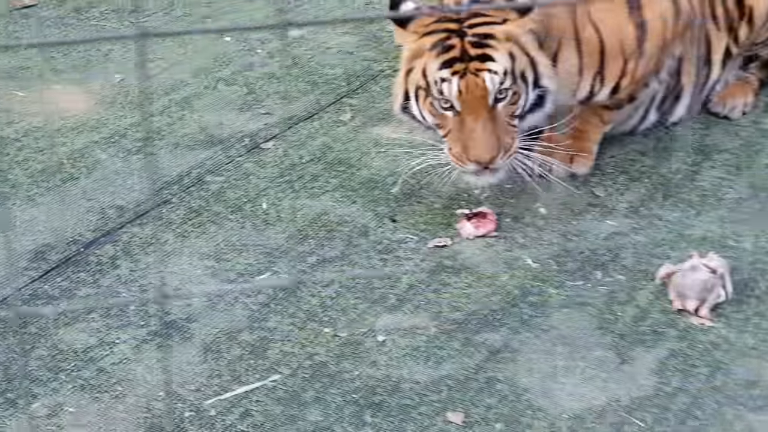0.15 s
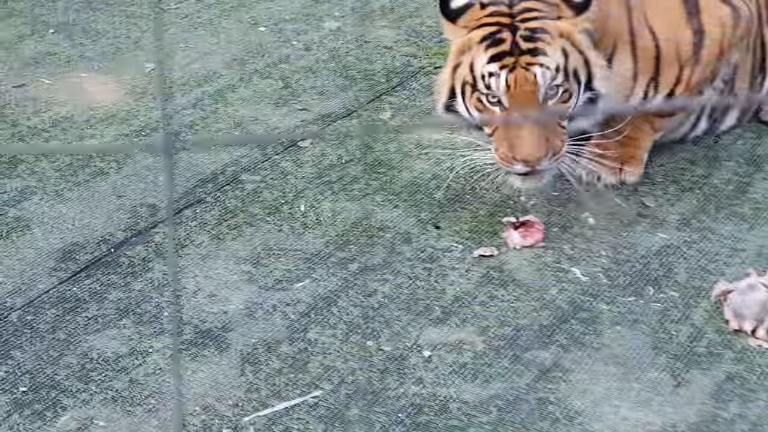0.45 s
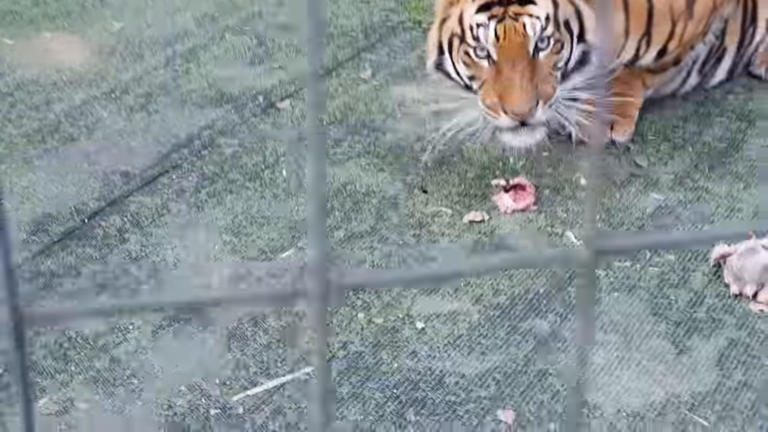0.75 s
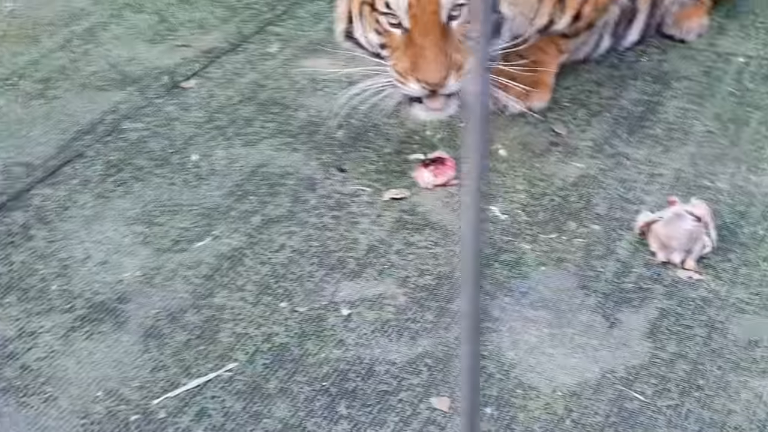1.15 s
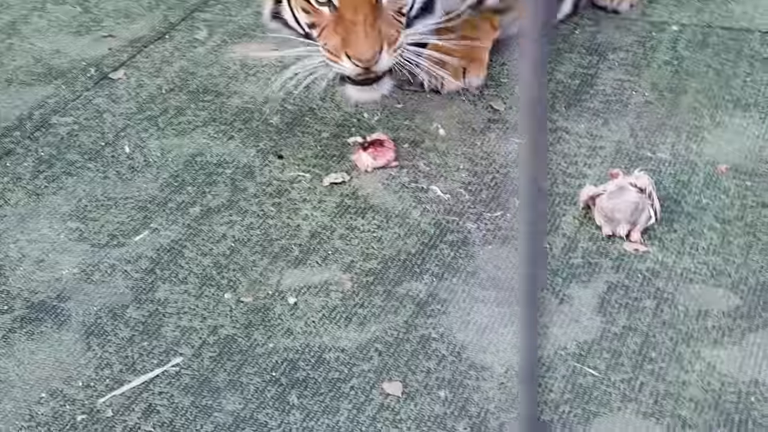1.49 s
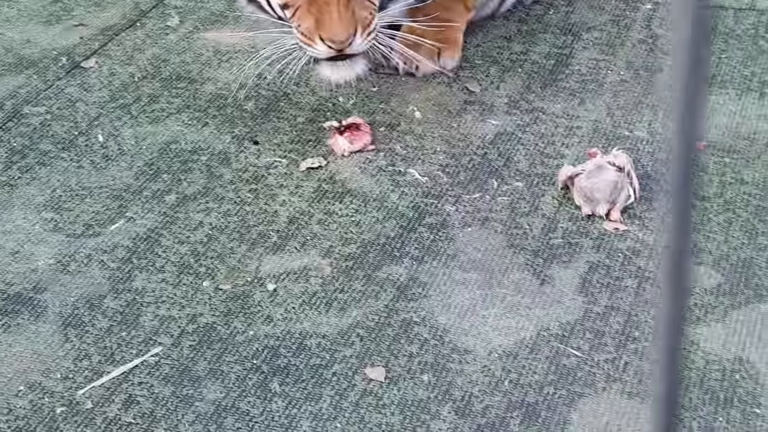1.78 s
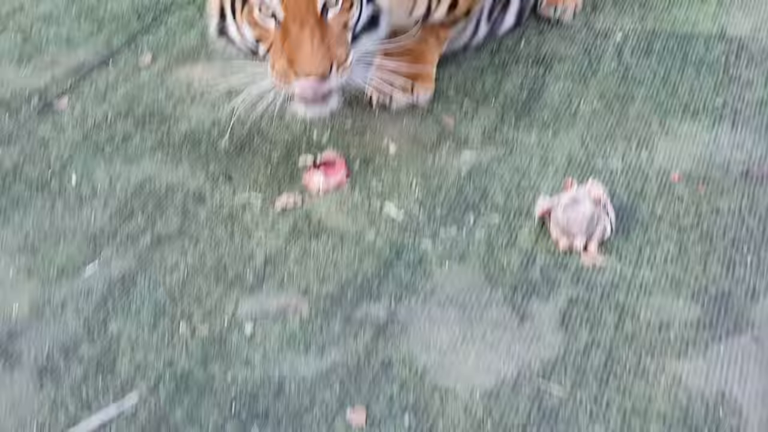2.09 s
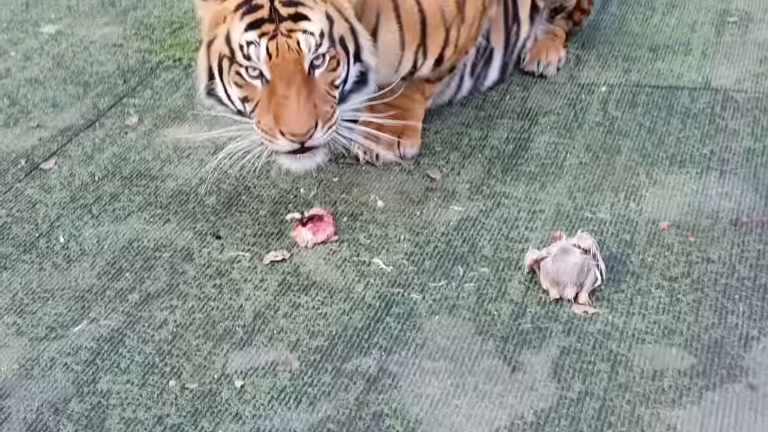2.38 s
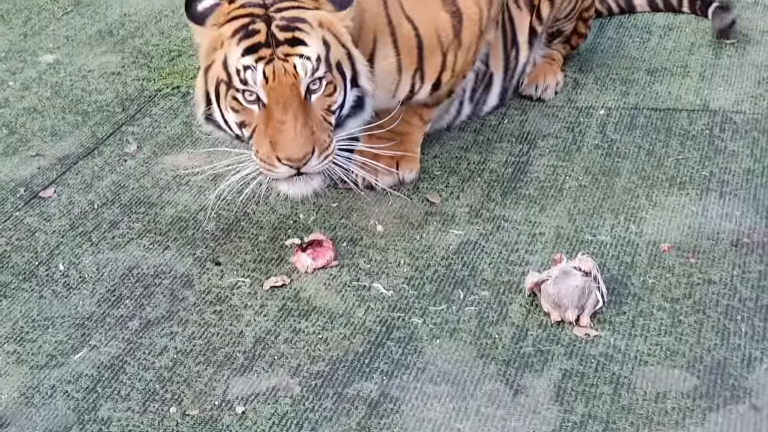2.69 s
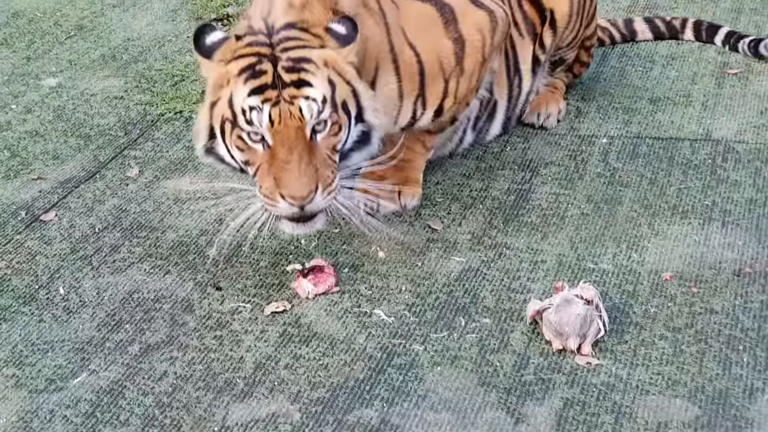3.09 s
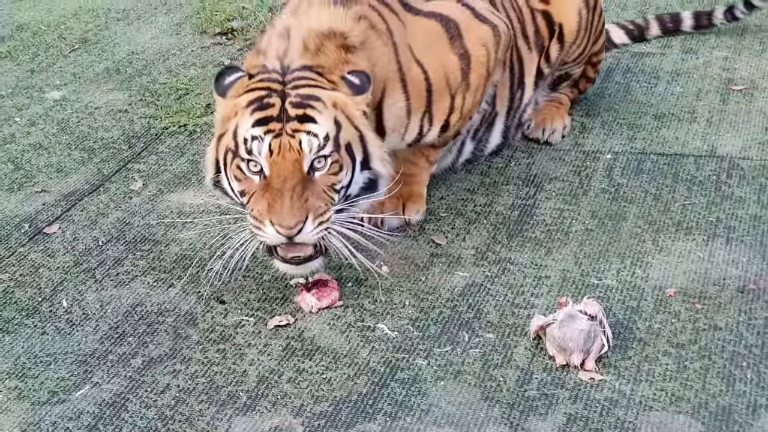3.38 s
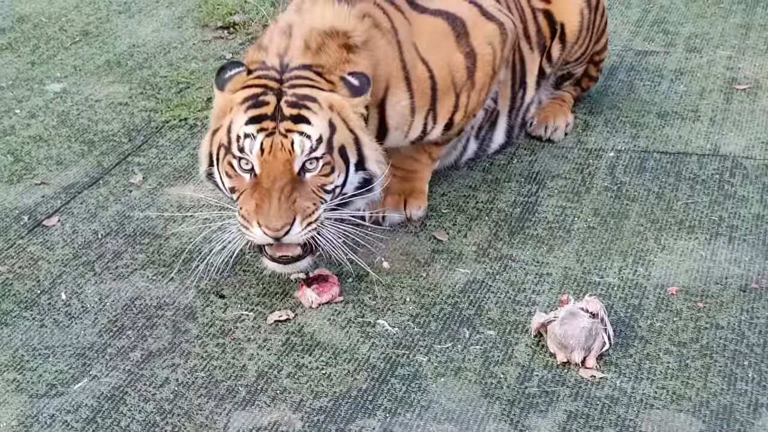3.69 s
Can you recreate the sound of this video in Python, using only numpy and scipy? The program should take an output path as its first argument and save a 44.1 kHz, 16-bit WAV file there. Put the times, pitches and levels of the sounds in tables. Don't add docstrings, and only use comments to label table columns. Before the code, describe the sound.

A tiger rumbles low and steady, then bursts into two rough open-mouthed snarls, close outdoors.

```python
import sys
import numpy as np
from scipy import signal
from scipy.fft import rfft, irfft, next_fast_len
from scipy.io import wavfile
from scipy.ndimage import uniform_filter1d, map_coordinates

SR = 44100
rng = np.random.default_rng(int(sys.argv[2]) if len(sys.argv) > 2 else 0)


def master_out(mix):
    frames = np.transpose(np.atleast_2d(mix))
    ceiling = np.clip(frames, -1, 1)
    pcm = np.round(ceiling * 32767).astype(np.int16)
    wavfile.write(sys.argv[1], SR, pcm)


def elevation(decibels):
    levels = np.asarray(decibels, float)
    return 10 ** (levels / 20)


N = 169785
T = np.arange(N) / SR


def unit(x):
    return x / np.sqrt(np.mean(x ** 2) + 1e-20)


def along(points, hz):
    f, v = np.transpose(points)
    return np.interp(np.log(hz + 1), np.log(f + 1), v)


def wobble(rate):
    return map_coordinates(rng.standard_normal(int(N * 400 / SR) + 4), [T * rate])


def filtered(x, response):
    m = next_fast_len(N + SR // 2)
    return irfft(rfft(x, m) * response(np.fft.rfftfreq(m, 1 / SR)), m)[..., :N]


def rings(peaks):
    def response(f):
        total = 0
        for k, (centre, width, db) in enumerate(peaks):
            damping = 1j * f * width
            total = total + (-1) ** k * elevation(db) * damping / (centre * centre - f * f + damping)
        return total
    return response


def rush(spectrum, alike, left_db):
    def mid_side(hz):
        turn = np.arccos(np.clip(along(alike, hz), -1, 1)) / 2
        return elevation(along(spectrum, hz)) * [np.cos(turn), np.sin(turn)]

    mid, side = filtered(rng.standard_normal((2, N)), mid_side)
    pair = np.array([mid + side, mid - side])
    return unit(filtered(pair, lambda hz: elevation(np.outer([.5, -.5], along(left_db, hz)))))


def outdoor_air():
    # f/Hz, level/dB
    air_colour = [(15, -6), (25, -34), (77, 1), (600, -29), (1210, -33), (2300, -44), (7540, -53),
                  (8860, -42), (15600, -60)]
    # f/Hz, level/dB
    air_left = [(100, 2.5), (9000, 3.6)]
    # f/Hz, likeness/0-1
    air_alike = [(150, 1), (950, 0.057), (4000, 0.041)]
    return elevation(-45.5 + 0.49 * wobble(2.8)) * rush(air_colour, air_alike, air_left)


def grass():
    # peak t/s, attack/s, release/s, level/dB
    scuffs = [
        (.005, 0.012, 0.0048, -48),
        (.3, .1, 0.58, -57),
        (.42, 0.09, 0.077, -60.5),
        (1.036, 0.055, 0.02, -42),
        (1.12, 0.14, 0.13, -55.5),
        (2.05, .04, 0.1, -94),
        (2.3, 0.022, 0.087, -70),
        (2.562, 0.036, 0.031, -52.5),
    ]
    # f/Hz, level/dB
    grass_colour = [(180, -6.5), (300, -14), (1310, -13), (4290, -32.5), (7050, -41), (9190, -28),
                    (15600, -36)]
    env = 0
    for s, up, down, db in scuffs:
        away = np.where(T < s, (s - T) / up, (T - s) / down)
        env = env + elevation(db - 7.8 * away ** 1.7)
    crackle = elevation(2.8 * wobble(300) + wobble(30.45))
    noise = rush(grass_colour, [(300, 1.0), (9000, 0.076)], [(300, 1.7), (9000, 2.5)])
    return env * unit(crackle * noise)


def yard(x):
    # f/Hz, t60/s
    decay = [(150, 1), (1500, 0.11), (10000, 0.2)]
    hz, t, z = signal.stft(rng.standard_normal((2, SR // 2)), SR, nperseg=256)
    tail = signal.istft(z * elevation(-60 * t / along(decay, hz)[:, None]), SR, nperseg=256)[1]
    mix = np.array([tail[0] + 0.15 * tail[1], tail[0] - 0.64 * tail[1]])
    late = np.pad(x, (300, 0))[None]
    echo = signal.fftconvolve(late, mix / np.linalg.norm(mix[0]), axes=1)[:, :N]
    return filtered(echo, lambda hz: elevation(-9) * hz / (hz + 303))


def nose():
    # f/Hz, width/Hz, level/dB
    nostril = [
        (2770, 610, 0),
    ]
    gusts = elevation(3.2 * wobble(45.0)) * rng.standard_normal(N)
    hiss = filtered(gusts, lambda f: rings(nostril)(f) ** 2)
    return elevation(-70 - 10 * (T / 0.81) ** 4) * unit(hiss)


def pops(rows, cycles):
    out, t = np.zeros(N + SR), np.arange(SR // 20) / SR
    for s, db, hz in rows:
        decay = elevation(db + 5.5 - 60 * t * hz / cycles)
        onset = 1 - np.exp(-t * hz * 9 / cycles)
        out[round(s * SR):][:len(t)] += decay * np.sin(2 * np.pi * hz * t) * onset
    return out[:N]


def small_strokes():
    # t/s, peak level/dB, f/Hz
    ticks = [(0.329, -33, 970), (0.389, -22.5, 850), (0.43, -28.5, 407), (0.431, -25.5, 1250),
             (0.455, -41, 1240), (0.474, -33.5, 1220), (0.971, -59, 606), (1.201, -31, 1020),
             (2.087, -56.5, 450), (2.362, -44, 1250), (2.361, -47, 3980), (2.543, -33, 372),
             (2.564, -40, 5350), (2.428, -45, 3500), (2.563, -52, 9000), (3.106, -16, 353),
             (3.111, -11.5, 606), (3.145, -19.5, 480), (3.491, -11.5, 358), (3.508, -7, 533)]
    # t/s, peak level/dB, f/Hz
    squeak = [
        (3.478, -17, 8280),
    ]
    # t/s, peak level/dB, f/Hz
    smacks = [
        (3.106, -18.5, 1890),
        (3.146, -18.5, 1940),
        (3.311, -32.5, 5650),
        (3.358, -19, 4120),
        (3.444, -14.5, 2560),
        (3.49, -12, 2370),
        (3.563, -18, 3020),
        (3.584, -26, 2470),
    ]
    return pops(ticks, cycles=5.3) + pops(squeak, cycles=72) + pops(smacks, cycles=32)


def patchy(x, patchy_db):
    z = signal.stft(x, nperseg=256)[2]
    field = uniform_filter1d(rng.standard_normal(z.shape), size=4, axis=0)
    field = uniform_filter1d(field, size=5, axis=1)
    return signal.istft(z * elevation(patchy_db * unit(field)), nperseg=256)[1][:N]


def fold_flaps(k, jitter):
    # t/s, flaps per second/Hz
    rates = [
        [(0.0, 34.23), (0.2, 29.08), (0.35, 28.16), (0.5, 28.05), (0.7, 27.89), (0.9, 27.48), (1.1, 29.22),
         (1.3, 28.09), (1.5, 30.6), (1.65, 25.16), (1.8, 26.47), (2.0, 26.82), (2.2, 28.63), (2.35, 24.7),
         (2.5, 23.26), (2.7, 28.86), (3.0, 30.06)],
        [(2.98, 50.13), (3.06, 50.72), (3.13, 50.17), (3.3, 59.9)],
        [(3.29, 41.78), (3.37, 40.59), (3.43, 51.94), (3.47, 63.39), (3.51, 78.66), (3.55, 63.48),
         (3.59, 43.28), (3.69, 35.34), (3.85, 26.71)],
    ]
    first_flap = [.11, .24, .76]
    rate = np.interp(T, *np.transpose(rates[k]), left=0)
    opens = np.flatnonzero(np.diff(np.floor(np.cumsum(rate) / SR - first_flap[k])) > 0)
    period = SR / rate[opens]
    luck = rng.standard_normal((200, 6))[:len(opens)]
    first = np.clip(opens + jitter * period * luck[:, 0], 0, N - 1).astype(int)
    return first, period, luck


def chest_thumps(k, on, first, period, luck, size, chest_hz, over_db, jitter, rough):
    thump_lag = [0.008, 0.14, 0.299]
    over_hz = [255.3, 255, 233.6]
    ring_cycles = 2.68

    def chest_ring(c):
        return np.sin(2 * np.pi * c) * (1 - np.exp(-4 * c)) * np.exp(-(c / ring_cycles) ** 3.3)

    t = np.arange(SR // 10) / SR
    cycles = (chest_hz[first] * (1 + 2 * jitter * luck[:, 2]))[:, None] * t
    throat_cycles = over_hz[k] * t
    throat = np.sin(2 * np.pi * throat_cycles) * np.exp(-(throat_cycles / ring_cycles / 1.34) ** 2)
    throat = elevation(over_db[first, None] + 3.2 * luck[:, [3]]) * throat
    push = elevation(-3) * chest_ring(0.48 * cycles) * np.exp(-cycles / 2)
    ring = chest_ring(cycles) + throat - push
    thump = first + (thump_lag[k] * period).astype(int)
    places = thump[:, None] + np.arange(len(t))
    chest = np.bincount(places.ravel(), (size[:, None] * ring).ravel(), N + SR)[:N]
    churn_ring = rings([(chest_hz[on].mean(), 90, 0)])
    churn = filtered(on * rng.standard_normal(N), lambda f: churn_ring(f) ** 2)
    return unit(on * chest) + rough * unit(churn)


def throat_puffs(k, on, first, period, luck, size, scatter_db, leak):
    puff_s = [.003, 0.0026, 0.0029]
    second_flap = [0.27, 0.41, .27]
    second_db = [-3, -9, -5.5]
    t = np.arange(SR // 10) / SR
    delay = second_flap[k] * period * (1 + 0.1206 * luck[:, 4])
    second = np.minimum(first + delay, N - 1).astype(int)
    second_size = size * elevation(second_db[k] + scatter_db * luck[:, 5])
    flaps = on * np.bincount(np.r_[first, second], np.r_[size, second_size], N)
    puffs = signal.fftconvolve(flaps, np.exp(-(t / puff_s[k] - 1.3) ** 2))[:N]
    gate = unit(puffs) + leak / np.sqrt(on.mean())
    air = unit(on * gate * elevation(1.6 * wobble(390)) * rng.standard_normal(N))
    return flaps, air


def through_mouth(k, flaps, air, mouth_db, shift, click, tone):
    # f/Hz, width/Hz, level/dB
    mouth_shapes = [
        [[(653, 65, 8), (1250, 100, -9.5), (1850, 92, -51)], [(604, 73, 8.5), (1470, 60, 1.5), (1950, 174, 0.5),
         (3500, 590, -7), (8480, 92, -14.5)]],
        [[(530, 40, -1), (1220, 45, -0.5), (1745, 90, -6.5), (1990, 110, -19), (5430, 150, -20)],
         [(587, 77, 3.5), (1374, 54, -3), (1890, 190, -9.5), (2270, 27, -3), (2680, 130, -12.5),
         (5780, 110, -23), (8950, 700, -33)]],
        [[(647, 128, 3), (817, 148, -8.5), (1720, 160, -8.5), (2322, 74, 3), (2855, 63, -8.5),
         (4150, 150, -5.5), (5520, 123, -11.5), (9000, 370, -33)], [(576, 92, 9), (797, 80, -2),
         (1400, 100, -7.5), (1950, 170, 1), (2406, 360, -2.5), (3060, 160, -2.5), (3460, 100, -1.5),
         (4450, 650, -2), (5180, 150, -7), (5800, 250, -10)]],
    ]
    # f/Hz, level/dB
    breath = [
        [(180, -44), (300, -23), (418, -3), (601, -6), (954, -23), (3410, -17), (15600, -41)],
        [(180, -34), (300, -35), (732, 0.5), (1070, -45), (1880, -12), (3580, -31), (9500, -23.5), (15600, -47)],
        [(180, -70), (300, 0), (581, -28), (1200, -30), (2410, -14.5), (7170, -23), (8460, -17), (15600, -30)],
    ]
    source = air + click * unit(flaps)
    start, end = [unit(filtered(source, rings(peaks))) for peaks in mouth_shapes[k]]
    shift = np.clip(shift, 0, 1)
    mouth = tone * (np.sqrt(1 - shift) * start + np.sqrt(shift) * end)
    mouth = mouth + unit(filtered(air, lambda f: elevation(along(breath[k], f))))
    mouth = patchy(mouth, patchy_db=3)
    treble = filtered(mouth, lambda f: f ** 2 / (f ** 2 + 4900 ** 2))
    return mouth + treble * (elevation(mouth_db - mouth_db.max()) - 1)


def voice(k, chest_db, chest_hz, over_db, mouth_db, shift, jitter, rough, scatter_db, click, leak, tone):
    first, period, luck = fold_flaps(k, jitter)
    size = elevation(scatter_db * luck[:, 1])
    on = mouth_db > -99
    chest = chest_thumps(k, on, first, period, luck, size, chest_hz, over_db, jitter, rough)
    flaps, air = throat_puffs(k, on, first, period, luck, size, scatter_db, leak)
    mouth = through_mouth(k, flaps, air, mouth_db, shift, click, tone)
    return (elevation(chest_db) * unit(chest) + elevation(mouth_db) * unit(mouth)) * np.sqrt(on.mean())


def rumble():
    # t/s, chest level/dB, chest ring f/Hz, throat ring over the chest/dB
    chest_path = [(0, -33, 155, -13), (.12, -34.5, 152, -34), (.3, -41, 128.4, -7.5),
                  (.58, -42.5, 123.4, -9), (.78, -41, 163.6, -9), (1.0, -40, 146, -8.5),
                  (1.25, -39, 149, -11), (1.501, -36, 146, -11.5), (1.66, -40.5, 118.7, -9.5),
                  (1.899, -42, 134, -18.5), (2.25, -41.5, 119.4, -17.5), (2.45, -46, 99, -5),
                  (2.62, -51.5, 120, -19), (2.95, -103, 130, -17)]
    # middle t/s, half length/s, level/dB, brightness/0-1
    lip_gaps = [
        (0.1, 0.53, -63.5, 0.01),
        (0.589, 0.14, -52, 0.07),
        (0.693, 0.08, -54.5, 0.4),
        (1.158, 0.14, -58, 1),
        (1.497, 0.041, -54.5, 0),
        (1.595, 0.12, -49.5, 0.99),
        (2, 0.17, -96, 0.2),
        (2.442, 0.062, -57.5, 0.3),
    ]
    s, *rows = np.transpose(chest_path)
    chest_db, chest_hz, over_db = [np.interp(T, s, c) for c in rows]
    lips = np.array([top - 12 * ((T - mid) / half) ** 2 for mid, half, top, _ in lip_gaps])
    brightness = np.transpose(lip_gaps)[-1]
    shift = uniform_filter1d(brightness[lips.argmax(axis=0)], size=800)
    mouth_db = np.maximum(lips.max(axis=0), -90)
    return voice(0, chest_db, chest_hz, over_db, mouth_db, shift,
                 jitter=.006, rough=.15, scatter_db=1, click=.8, leak=.06, tone=3)


def snarls():
    # t/s, chest level/dB, chest ring f/Hz, mouth level/dB
    snarl_paths = [
        [(2.97, -52, 145, -64), (3.035, -38.5, 156, -44), (3.1, -29, 160, -37), (3.165, -24.5, 160, -35.5),
         (3.2, -47, 140, -50), (3.3, -39.5, 123, -72)],
        [(3.295, -27, 125, -45.5), (3.335, -29, 148, -32.5), (3.4, -20.5, 132, -26), (3.46, -25, 140, -28.5),
         (3.51, -17.5, 125, -30), (3.58, -29, 142, -30.5), (3.7, -27.5, 139.4, -39), (3.8, -37.5, 135, -45.5),
         (3.85, -29.5, 141, -46.5)],
    ]
    # from t/s, to t/s
    shift_s = [
        (3.05, 3.12),
        (3.42, 3.64),
    ]
    out = np.zeros(N)
    for k, rows in enumerate(snarl_paths):
        s, chest, hz, mouth = np.transpose(rows)
        chest_db, mouth_db = [np.interp(T, s, c, left=-120, right=-120) for c in (chest, mouth)]
        chest_hz = np.interp(T, s, hz)
        over_db = np.full(N, [-9, -8][k])
        shift = np.interp(T, shift_s[k], [0, 1])
        out = out + voice(k + 1, chest_db, chest_hz, over_db, mouth_db, shift,
                          jitter=.03, rough=.45, scatter_db=1, click=.3, leak=[.5, .25][k], tone=2.5)
    return out


def at_microphones(x):
    # f/Hz, level/dB
    left_db = [(100, 1.2), (700, 2.2), (3000, 3.5), (6000, 2), (8500, 12), (13000, 3.7)]
    # f/Hz, phase/rad
    left_leads = [(200, 0.1), (2500, 0.91), (6600, 0.98), (15000, 1.66)]
    side = np.array([[.5], [-.5]])
    return filtered(x, lambda hz: elevation(side * along(left_db, hz)) * np.exp(1j * side * along(left_leads, hz)))


def scene():
    tiger = rumble() + snarls() + nose() + small_strokes()
    return at_microphones(tiger + yard(tiger)) + grass() + outdoor_air()


def band_limit(x):
    return signal.sosfilt(signal.butter(12, 15740, fs=SR, output="sos"), x)


def record(dry):
    def port(hz):
        notch_db = -7 * np.exp(-((hz - 7400) / 600) ** 2)
        return elevation(notch_db) * (hz < 15750)

    return band_limit(filtered(dry, port))


dry = scene()
out = record(dry)
master_out(out)
```